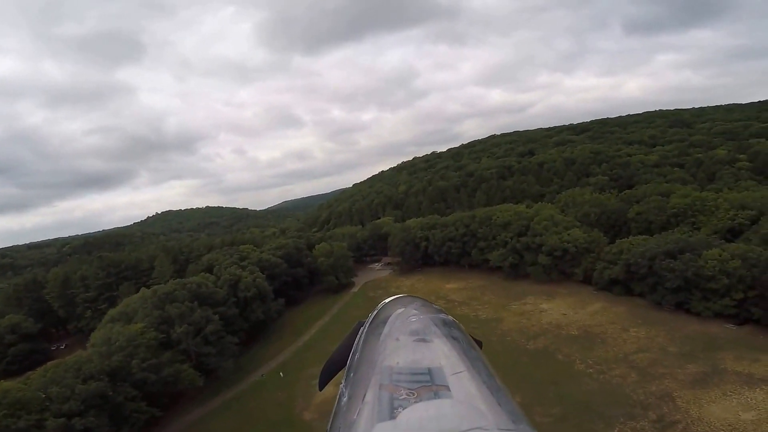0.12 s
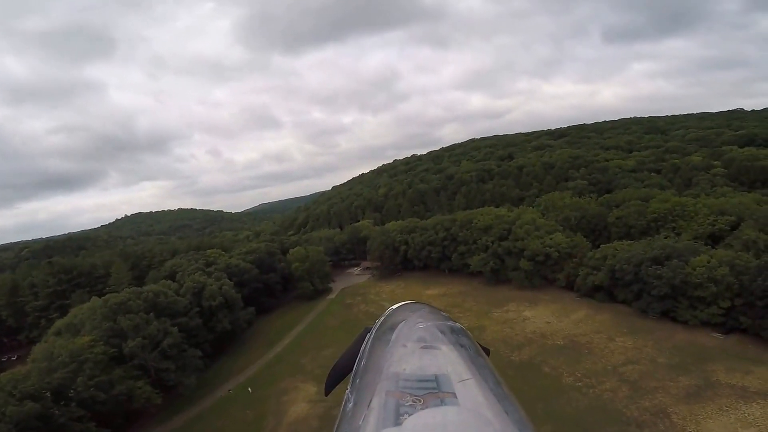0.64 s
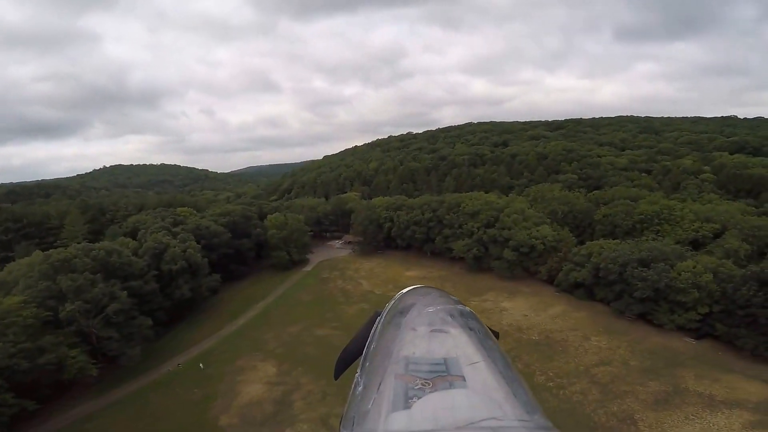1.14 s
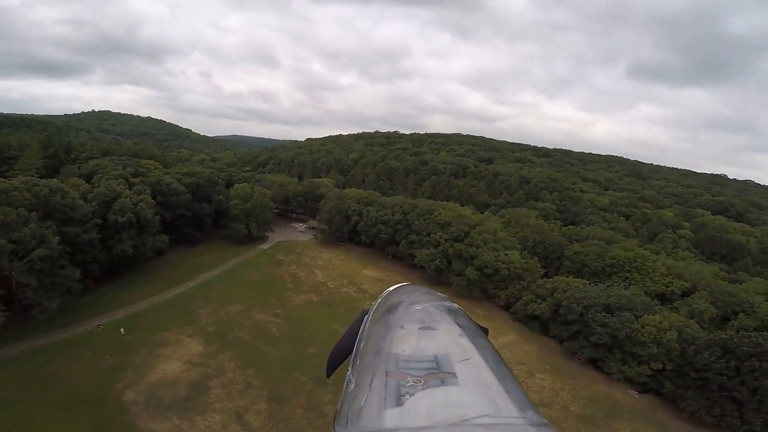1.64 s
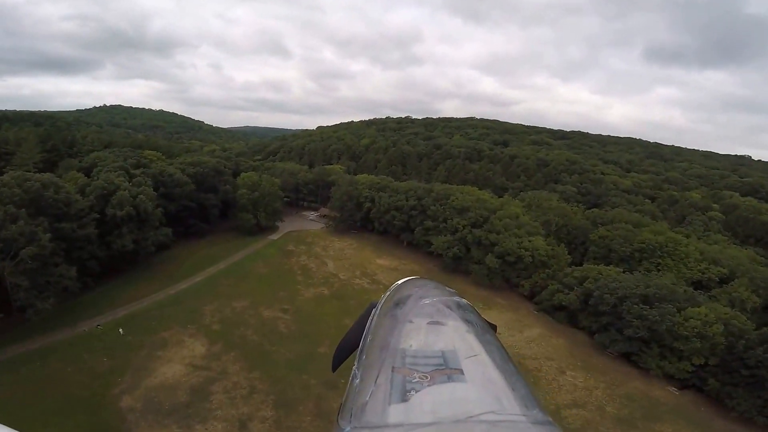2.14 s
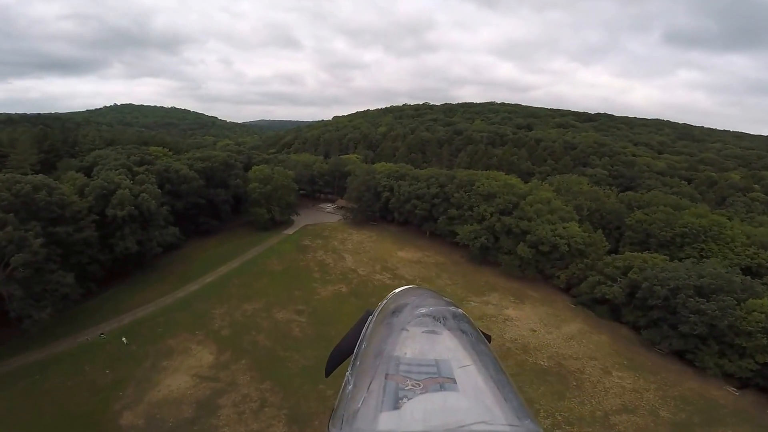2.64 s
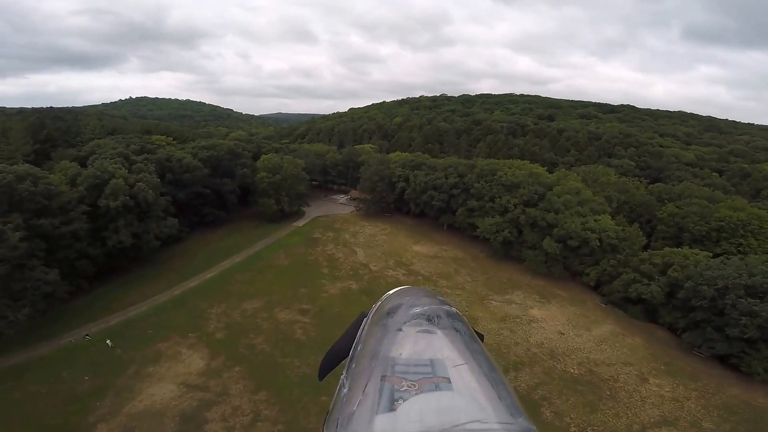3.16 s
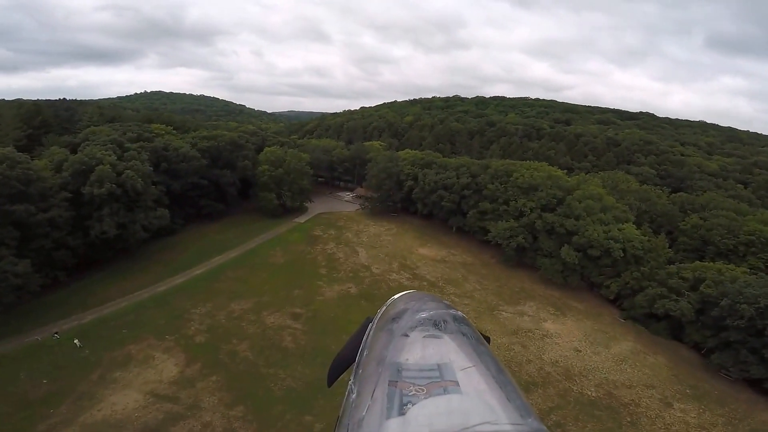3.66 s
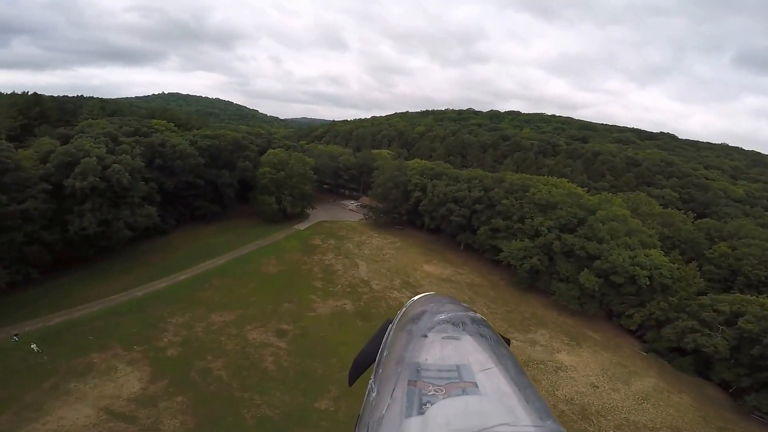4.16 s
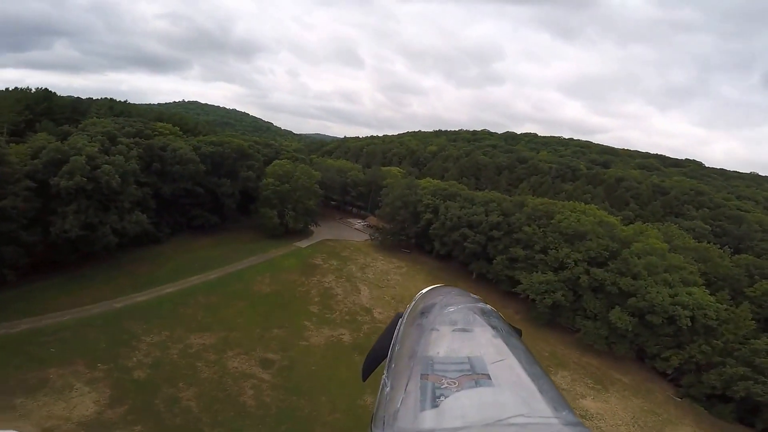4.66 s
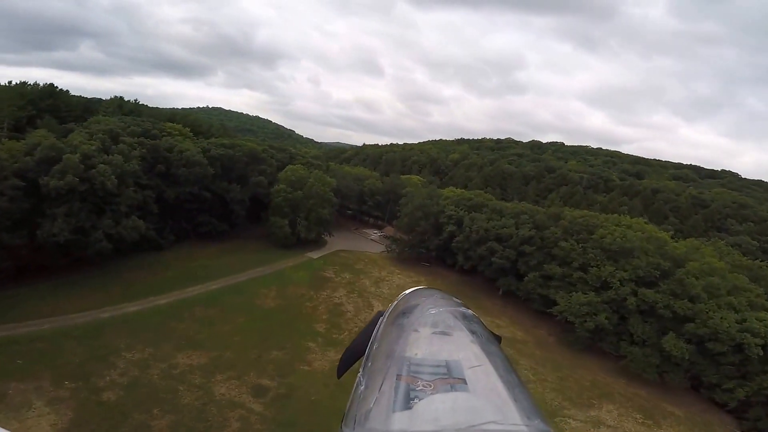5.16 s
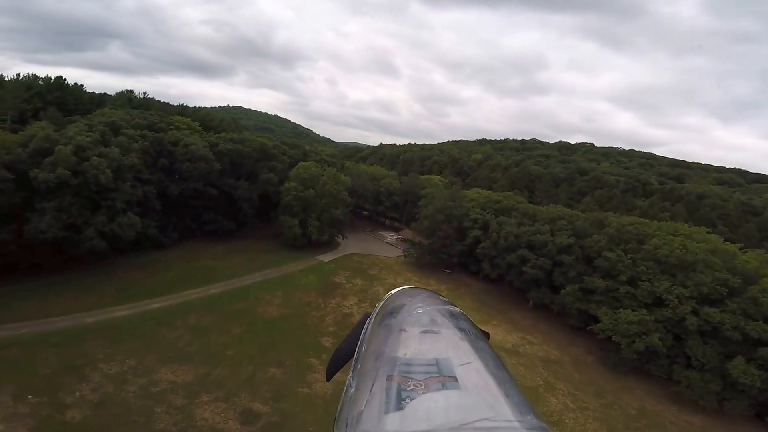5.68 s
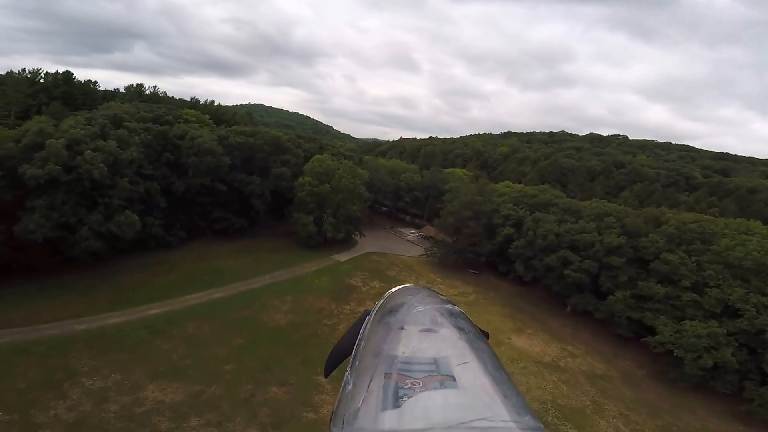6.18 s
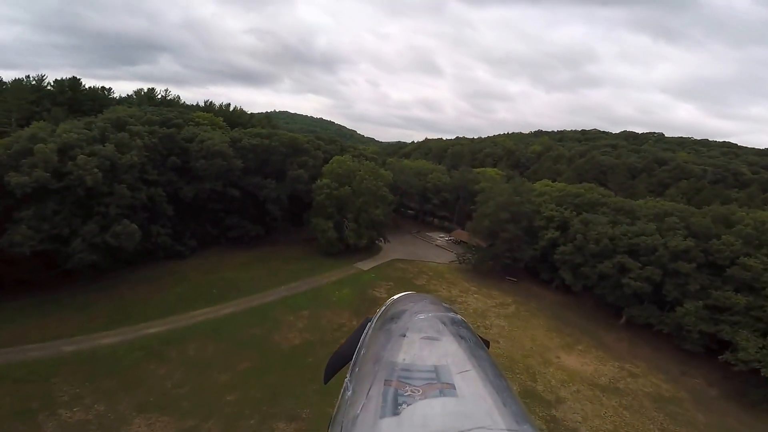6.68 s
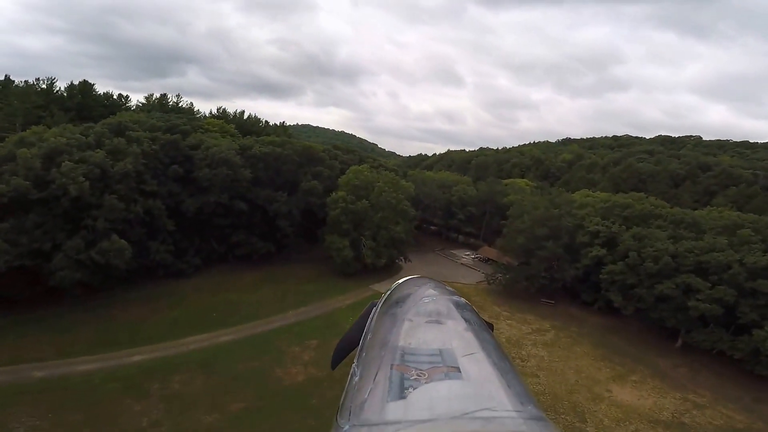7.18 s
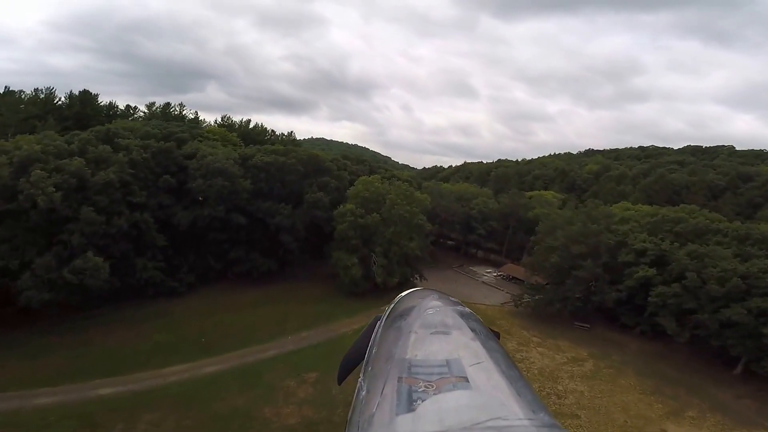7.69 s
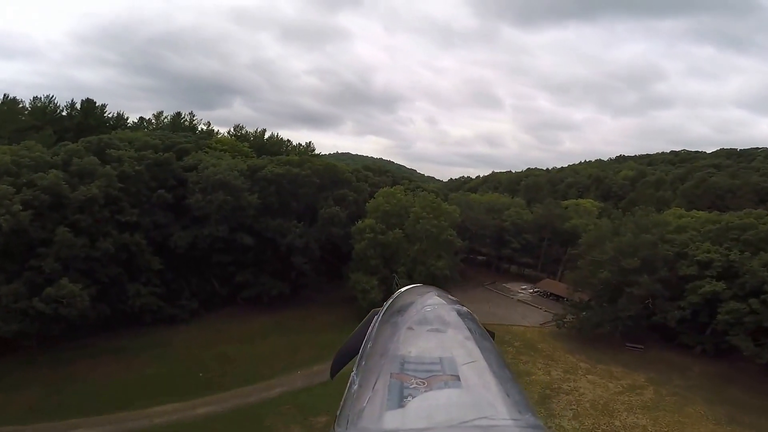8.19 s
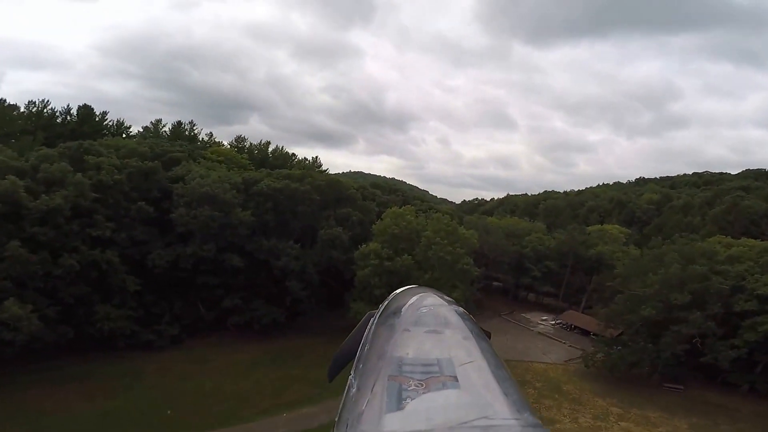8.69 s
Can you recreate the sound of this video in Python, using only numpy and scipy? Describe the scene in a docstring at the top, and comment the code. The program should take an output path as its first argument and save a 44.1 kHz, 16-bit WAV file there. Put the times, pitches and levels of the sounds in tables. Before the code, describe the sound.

Wind rushes over a microphone fixed to a model aircraft gliding above a meadow, motor silent. It opens with low thumps and a partly lifted roar, then bursts into a full, fluttering roar over deep rumble. Around three and a half seconds it thins, slams back with a hard clipped hit, and continues until a brief drop at the end. Close, mono, squeezed and overloaded.

```python
"""Wind over the microphone of a gliding model aircraft, motor off: large eddies buffet the port as a deep rumble.
A turbulent shear layer, noise with a fast flutter, roars over it and now and then lifts away.
Compact eddies add sharp puffs and thumps, air along the fuselage hisses, and faint wisps and ticks stand out.
The recorder squeezes the loud lumps, limits and clips the highest peaks."""
import sys
import numpy as np
from scipy import signal
from scipy.fft import rfft, irfft, next_fast_len
from scipy.io import wavfile
from scipy.ndimage import uniform_filter1d, minimum_filter1d, map_coordinates

SR = 44100
rng = np.random.default_rng(int(sys.argv[2]) if len(sys.argv) > 2 else 0)


def elevation(decibels):
    """Turn decibel levels (scalar or array-like) into linear amplitude ratios."""
    levels = np.asarray(decibels, float)
    return 10 ** (levels / 20)


def waveform_to_disk(signal):
    """Save audio, clipped to [-1, 1], as 16-bit WAV at the path in sys.argv[1]."""
    frames = np.transpose(np.atleast_2d(signal))
    scaled = np.clip(frames, -1, 1) * 32767
    samples = np.round(scaled).astype(np.int16)
    wavfile.write(sys.argv[1], SR, samples)


N = 388962  # length in samples

# compact eddies of the shear layer: start_s, peak_db, pitch_hz
PUFF_EVENTS = [(0.042, -21, 750), (0.144, -14, 550), (0.186, -15, 374), (0.199, -16, 350),
               (0.228, -15.5, 444), (0.259, -22, 900), (0.302, -30, 700), (0.344, -9.5, 754),
               (0.376, -12.5, 420), (0.387, -24, 700), (0.446, -16, 640), (0.455, -9, 630),
               (0.47, -12, 720), (0.491, -6, 520), (0.501, -10.5, 600), (0.525, -10, 520),
               (0.552, -14, 420), (0.592, -9, 520), (0.612, -6, 467), (0.628, -10.5, 611), (0.799, -4, 570),
               (0.95, -6.5, 560), (2.287, -10.5, 550), (3.004, -10, 730), (3.103, -13, 500),
               (3.222, -4.5, 544), (3.683, -20, 380), (3.719, -20, 900), (3.979, -9, 930),
               (3.99, -15.5, 1300), (4.002, -12, 790), (4.02, 0, 400), (4.033, -12, 608), (4.072, -11, 600),
               (4.33, -8, 790), (5.339, -7, 627), (5.812, -23, 789), (5.888, -13, 694), (5.923, -8, 681),
               (5.966, -8.5, 900), (7.147, -8.5, 600), (7.888, -13, 500), (8.393, -8, 503),
               (8.747, -15, 500), (8.798, -25, 950)]
# whole eddies striking the port: steep_middle_s, peak_db, pitch_hz, direction (1 falling, -1 rising)
THUMP_EVENTS = [(0.146, -8, 50, 1), (0.193, -3, 60, -1), (0.232, -10, 80, 1), (0.302, -7, 60, -1),
                (0.351, -7, 50, -1), (0.383, -7, 50, -1), (0.403, -8, 85, 1), (3.468, -5, 60, -1),
                (3.571, -7, 70, -1), (3.983, -1, 50, -1), (4.018, -4, 98, -1), (4.0222, 4, 300, 1),
                (4.0256, 8, 400, 1), (4.065, -4, 78, -1), (5.774, -4, 50, 1), (5.857, -4, 70, -1),
                (8.752, -4, 55, 1)]


def unit(x):
    """Normalisation to unit root-mean-square."""
    return x / np.sqrt(np.mean(x ** 2) + 1e-20)


def curve(points):
    """Linear interpolation of (time_s, value) points, one value per sample."""
    time_s, value = np.transpose(points)
    return np.interp(np.arange(N) / SR, time_s, value)


def wobble(rate):
    """Slow random modulation: a cubic spline through Gaussian knots, rate knots a second."""
    knots = rng.standard_normal(3600)
    return map_coordinates(knots, [np.arange(N) * rate / SR])


def coloured(x, spectrum):
    """Linear filtering: gains of (hz, db) points on a log frequency axis, then rms 1."""
    size = next_fast_len(N + 8192)
    hz, db = np.transpose(spectrum)
    log_frequency = np.log(np.fft.rfftfreq(size, 1 / SR) + 1)
    gain = elevation(np.interp(log_frequency, np.log(hz + 1), db))
    return unit(irfft(rfft(x, size) * gain, size)[:N])


def rush(spectrum, patchy_db):
    """Turbulence noise: a random spectrum with patches of gain in time and frequency."""
    bins = signal.stft(rng.standard_normal(N), nperseg=512)[2]
    patches = uniform_filter1d(rng.standard_normal(bins.shape), size=6, axis=0)
    patches = uniform_filter1d(patches, size=6, axis=1)
    noise = signal.istft(bins * elevation(patchy_db * unit(patches)), nperseg=512)[1][:N]
    return coloured(noise, spectrum)


def evened(x, span_s, share):
    """Envelope compression: a share of the slow swelling is divided out."""
    power = np.abs(uniform_filter1d(x ** 2, int(span_s * SR)))
    return unit(x / (power + 0.02) ** (share / 2))


def lift_db():
    """Flow separation: the drop of the roar while the layer is lifted off the port."""
    # spells of separated flow, which may overlap and add: start_s, end_s, drop_db
    separations = [(-0.1, 0.44, 17.5), (0.443, 0.6, 0), (0.458, 0.464, 14), (0.487, 0.496, 2),
                   (0.495, 0.508, 6), (0.51, 0.519, 22), (0.53, 0.549, 3), (0.572, 0.607, 7),
                   (2.144, 2.202, 1), (3.052, 3.08, 3), (3.315, 3.976, 16), (3.36, 3.577, 5),
                   (3.577, 3.69, 1.5), (3.84, 3.86, 2), (3.764, 3.798, 2.5), (4.013, 4.02, 10),
                   (4.05, 4.059, 16), (4.08, 4.125, 4), (5.775, 5.813, 6.5), (5.826, 5.883, 5),
                   (5.863, 5.884, 10.5), (7.002, 7.04, 3.5), (7.098, 7.147, 2.5), (8.261, 8.279, 8),
                   (8.305, 8.342, 3.5), (8.368, 8.397, 5), (8.702, 8.9, 15)]
    edge_s = 0.0023
    clock = np.arange(N) / SR
    drop_db = np.zeros(N)
    for start_s, end_s, db in separations:
        lifted = (1 + np.tanh((clock - start_s) / edge_s)) / 2
        returned = (1 + np.tanh((clock - end_s) / edge_s)) / 2
        drop_db += db * (lifted - returned)
    return drop_db


def buffeting():
    """Large-eddy pressure fluctuation: low-frequency noise swelling at random and at marked moments."""
    # spectrum of the rumble: hz, relative_level_db
    rumble_spectrum = [(8, -35), (16, -3.5), (30, 1), (45, -3), (76, -3.5), (130, -8.5), (220, -16),
                       (400, -23.5), (700, -40.5), (1500, -61), (3000, -82), (6000, -110)]
    # marked swells and lulls: centre_s, change_db
    marked_swells = [(0.068, -7.5), (0.24, -6), (0.42, -1), (0.54, -5), (0.61, 6), (1.08, -8), (1.15, 0),
                     (1.23, 2.5), (1.28, -8), (1.37, 6), (1.62, -4), (1.69, 1.5), (2.36, -9), (2.46, 1.5),
                     (2.55, -2.5), (2.8, 2), (2.85, 2.5), (2.95, 4), (3.12, 3), (3.34, -6), (3.46, 2),
                     (3.51, -2), (4.025, -5), (4.12, -7.5), (4.2, -1), (4.81, 3), (4.89, -4), (5.11, 3.5),
                     (5.38, 4), (5.48, -1), (5.84, 1), (5.88, -8), (7.17, 6.5), (7.22, -7), (7.32, 1),
                     (7.56, -1), (7.64, 2), (8.72, 2.5), (8.79, -2.5)]
    base_db, swell_db, swell_rate, swell_width_s = -13.5, 0.5, 17, 0.02  # swell_rate: knots a second
    calming = 0.014  # dB the rumble loses per dB of lift
    thump_covers_db = 7  # a thump takes the place of the random rumble
    dull_at_db = 35.5  # lift at which the upper part would be gone
    ragged_db, ragged_rate = 4, 40  # random modulation of the upper part, knots a second

    clock = np.arange(N) / SR
    drop_db = lift_db()
    level_db = base_db - calming * drop_db + swell_db * wobble(swell_rate)
    for centre_s, change_db in marked_swells:
        level_db += change_db * np.exp(-((clock - centre_s) / swell_width_s) ** 2)
    covered = np.max([np.exp(-((clock - s) * hz) ** 2) for s, _, hz, _ in THUMP_EVENTS], axis=0)
    level_db -= thump_covers_db * covered

    lumps = evened(rush(rumble_spectrum, patchy_db=-0.7), span_s=0.047, share=0.78)
    deep = uniform_filter1d(uniform_filter1d(lumps, size=90), size=90)
    dull = np.clip(drop_db / dull_at_db, 0, 1) ** 2
    ragged = elevation(ragged_db * wobble(ragged_rate)) * (lumps - deep)
    return elevation(level_db) * (deep + (1 - dull) * ragged)


def shear(flutter_db, rumble):
    """Shear-layer turbulence: small eddies in a fluttering stream, modulated by the large ones."""
    # spectrum of the roar: hz, relative_level_db
    roar_spectrum = [(60, -29), (150, -4), (260, -3), (400, 0), (600, -1.5), (880, -4.5), (1340, -12.5),
                     (2000, -23.5), (3000, -34.5), (4500, -43), (7000, -58), (12000, -120)]
    # base level of the clinging layer, weakest near the end as the glide slows: time_s, level_db
    clinging_levels = [(0.5, -17), (1.3, -17.5), (2.7, -16.5), (3.2, -17.5), (4.2, -15.5), (5.7, -16.5),
                       (6.7, -16), (7.05, -18), (7.5, -15), (8.1, -17.5), (8.45, -22.5), (8.7, -19)]
    gust_depth_db, gust_rate = 1.0, 25  # random gusts, knots a second
    loose_db = 2  # extra gust depth at 20 dB of lift
    rides_db, trough_s, rise_s = 1.33, 0.0038, 0.0072  # flare ahead of a trough and the rise after it
    hush_db, hush_s = 3, 0.0033  # depth, and lead before a puff

    clock = np.arange(N) / SR
    drop_db = lift_db()
    gust_db = (gust_depth_db + loose_db * drop_db / 20) * wobble(gust_rate)
    eddy = uniform_filter1d(rumble, size=130)
    coming_rise = np.roll(eddy, -round(rise_s * SR)) - np.roll(eddy, -round(trough_s * SR))
    gust_db += rides_db * unit(coming_rise)
    hush = np.max([np.exp(-((clock - s) / hush_s + 1) ** 2) for s, *_ in PUFF_EVENTS], axis=0)
    gust_db -= hush_db * hush
    stream = elevation(flutter_db) * rush(roar_spectrum, patchy_db=0.18)
    level_db = curve(clinging_levels) - drop_db + gust_db
    return elevation(level_db) * evened(stream, span_s=0.051, share=0.43)


def air(flutter_db):
    """Boundary-layer hiss: two noise bands rise together and share part of the shear flutter."""
    # air rushing along the fuselage: time_s, upper_hiss_db
    hiss_levels = [(0.0, -61), (0.4, -61), (0.88, -61), (1.5, -65.5), (2.8, -65.5), (3.44, -63),
                   (3.88, -59.5), (4.42, -60), (5.06, -61.5), (5.43, -63), (5.75, -62), (6.3, -64.5),
                   (7.25, -62.5), (7.54, -60.5), (8.47, -67), (8.82, -62.5)]
    # spectra of the two bands: hz, relative_level_db
    lower_spectrum = [(500, -15), (1200, 3.5), (2200, 0.5), (3200, -3.5), (4400, -6.5), (5500, -11),
                      (6800, -16), (8000, -22), (11000, -54)]
    upper_spectrum = [(5000, -18), (8000, 0), (9500, 2.5), (11000, 0), (13000, -3), (15000, -16),
                      (17000, -47)]
    lower_mean_db = -45

    upper_db = curve(hiss_levels)
    lower_db = lower_mean_db + upper_db - upper_db.mean()
    lower_flutter = elevation(0.4 * flutter_db + 0.75 * wobble(13))
    upper_flutter = elevation(0.2 * flutter_db + 0.8 * wobble(5.8))
    lower = unit(lower_flutter * rush(lower_spectrum, patchy_db=1.0))
    upper = unit(upper_flutter * rush(upper_spectrum, patchy_db=1.8))
    return elevation(lower_db) * lower + elevation(upper_db) * upper


def wisps():
    """Broad resonance: brief bright swells of band-passed noise, mostly heard while the roar is away."""
    # wisps of air: start_s, level_db (noise rms before the swell shapes it), pitch_hz
    wisp_events = [(0.022, -39, 1850), (0.131, -30.5, 1540), (0.1994, -41, 2010), (3.6022, -44, 1340),
                   (3.717, -34, 1720), (3.745, -47, 1310), (3.803, -43, 1350), (3.8656, -42, 1500),
                   (8.786, -26, 1720)]
    rise_s = 0.017

    out, t = np.zeros(N + SR), np.arange(SR // 10) / SR
    frequency = np.fft.rfftfreq(len(t), 1 / SR)
    swell = t / rise_s * np.exp(-t / rise_s)
    for start_s, level_db, hz in wisp_events:
        resonance = np.exp(-(np.log((frequency + 1) / hz) / 0.17) ** 2)
        band = unit(irfft(rfft(rng.standard_normal(len(t))) * resonance, len(t)))
        out[round(start_s * SR):][:len(t)] += elevation(level_db) * band * swell
    return out[:N]


def puffs():
    """Compact-eddy impulse: noise around its own pitch starts sharply, dies fast and has a jolt at its front."""
    # spectrum of the pressure jolt: hz, relative_level_db
    jolt_spectrum = [(60, -33), (150, -2), (300, 8), (600, -8), (1000, -19), (1600, -19), (3000, -39),
                     (7000, -67), (12000, -120)]
    attack_s, decay_s = 0.00034, 0.0058
    top_ratio = 1.3  # upper edge of a puff over its pitch
    jolt_db, jolt_lag_s = -8.5, 0.00187  # relative to the peak of the puff; after its start

    out, jolts, t = np.zeros(N + SR), np.zeros(N), np.arange(SR // 10) / SR
    frequency = np.fft.rfftfreq(len(t), 1 / SR)
    envelope = (1 - np.exp(-t / attack_s)) * np.exp(-(t / decay_s) ** 2)
    for start_s, peak_db, hz in PUFF_EVENTS:
        ratio = frequency / hz
        band = ratio ** 2 / (1 + ratio ** 2) / (1 + (ratio / top_ratio) ** 5)
        burst = envelope * irfft(rfft(rng.standard_normal(len(t))) * band, len(t))
        out[round(start_s * SR):][:len(t)] += elevation(peak_db) * burst / np.abs(burst).max()
        jolts[round((start_s + jolt_lag_s) * SR)] = -elevation(peak_db + jolt_db)
    fronts = coloured(jolts, jolt_spectrum)
    return out[:N] + fronts * jolts.min() / fronts.min()  # the deepest jolt keeps its level


def thumps():
    """Harmonic steepening: phase-locked overtones make a short pressure swing steepest in its middle."""
    overtone_ratio = 0.48  # each overtone over the one below

    out, t = np.zeros(N + SR), np.arange(SR // 10) / SR
    for middle_s, peak_db, hz, direction in THUMP_EVENTS:
        cycles = t * hz
        swing = sum(overtone_ratio ** k * np.sin(2 * np.pi * (k + 1) * cycles) for k in range(5))
        swing *= np.sin(np.pi * np.clip(cycles / 2, 0, 1)) ** 2  # two cycles long
        start = round((middle_s - 1 / hz) * SR)
        out[start:][:len(t)] -= direction * elevation(peak_db) * swing / np.abs(swing).max()
    return out[:N]


def ticks():
    """Broadband impulse: each faint dry tick is a single three-sample spike."""
    # ticks: start_s, level_db (of the side samples, half the peak)
    tick_events = [(2.7237, -35), (2.7906, -41), (4.0394, -51), (6.7106, -50)]
    out = np.zeros(N)
    for start_s, level_db in tick_events:
        out[round(start_s * SR):][:3] += elevation(level_db) * np.array([-1, 2, -1])
    return out


def scene():
    """Superposition of the wind pressures at one microphone and a few faint dry ticks; roar and hiss share a
    flutter."""
    flutter_db = 0.54 * wobble(3.1) + 0.96 * wobble(45) + 0.89 * wobble(130) + 0.69 * wobble(300)
    rumble = buffeting()
    wind = rumble + shear(flutter_db, rumble) + air(flutter_db)
    return (wind + wisps() + puffs() + thumps() + ticks())[None]


def low_pass(x):
    """Removes everything above the highest recorded frequency."""
    return signal.sosfilt(signal.butter(12, 15200, fs=SR, output="sos"), x)


def record(dry):
    """Dynamic range compression: quick gain control squeezes loud lumps, a limiter holds peaks, the rest clip."""
    level = np.sqrt(np.abs(uniform_filter1d(dry ** 2, int(0.018 * SR), axis=1)))
    squeezed = elevation(1.64) * dry / (3.0 + (level / 0.51) ** 2) ** 0.2
    needed = np.minimum(1, 0.93 / (np.abs(squeezed) + 1e-9))
    held = minimum_filter1d(needed, size=400, axis=1)
    gain = uniform_filter1d(held, size=400, axis=1)
    mix = np.clip(squeezed * gain, -0.91, 0.91)
    return low_pass(mix)


dry = scene()
out = record(dry)
waveform_to_disk(out)
```